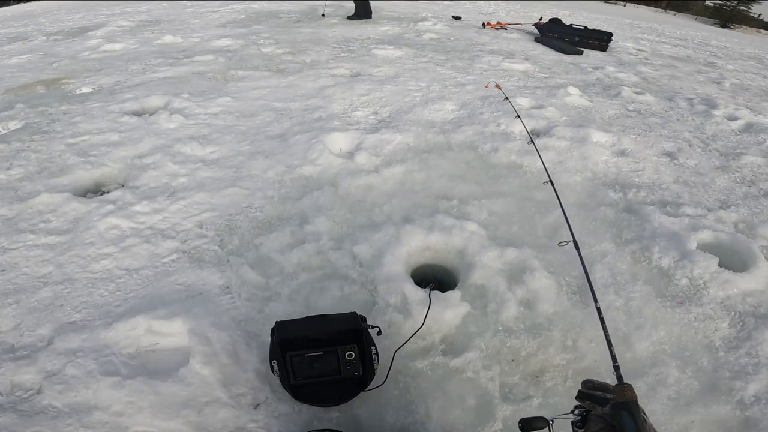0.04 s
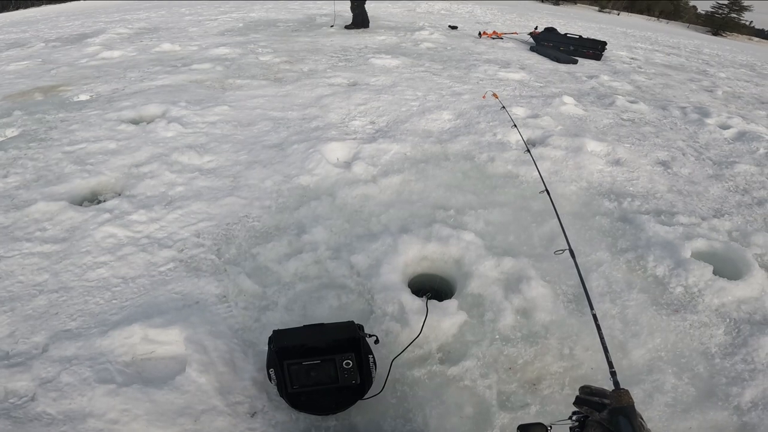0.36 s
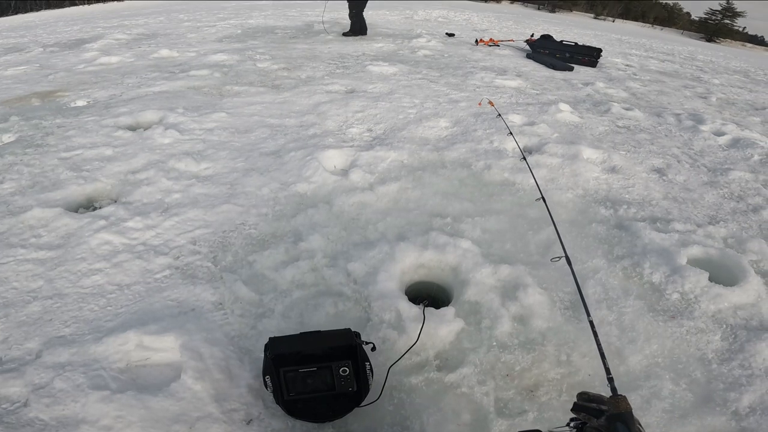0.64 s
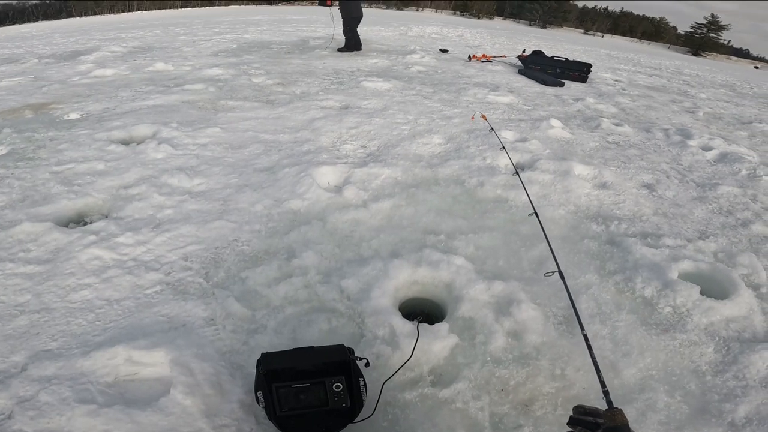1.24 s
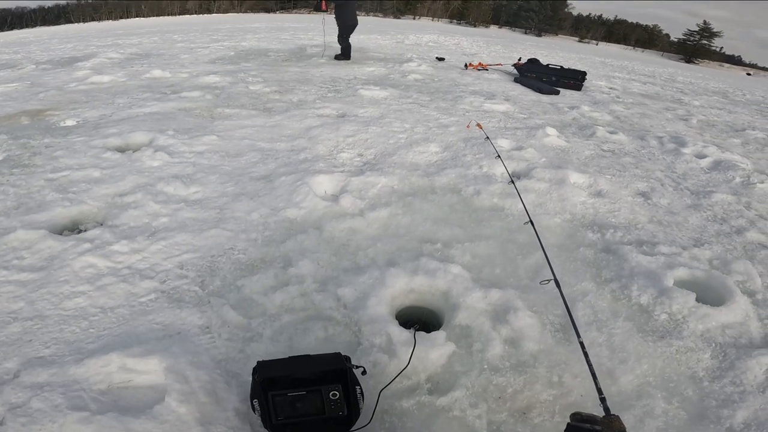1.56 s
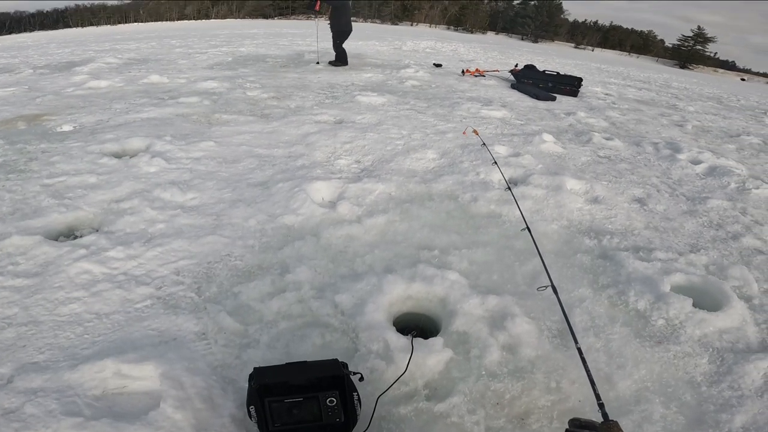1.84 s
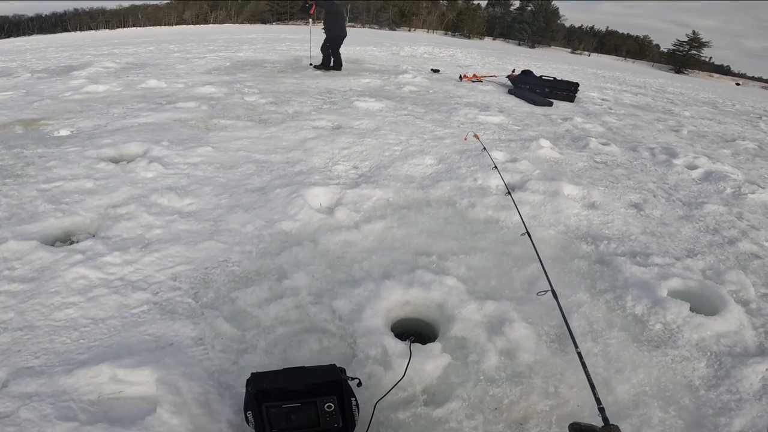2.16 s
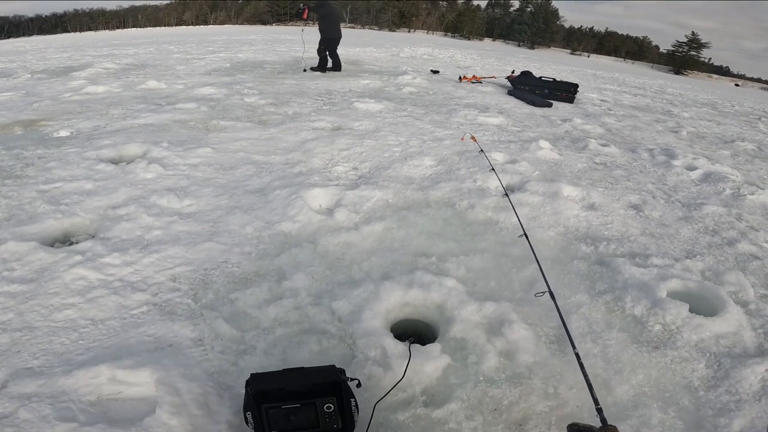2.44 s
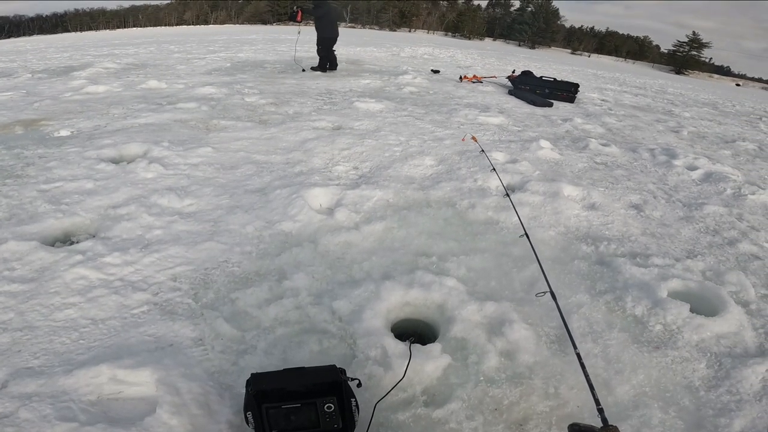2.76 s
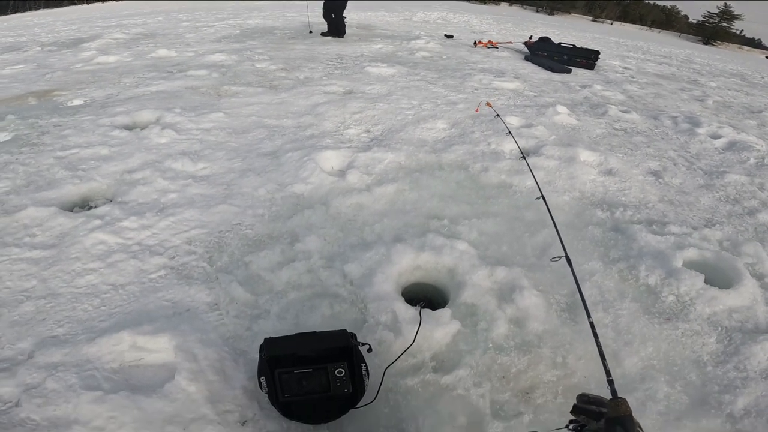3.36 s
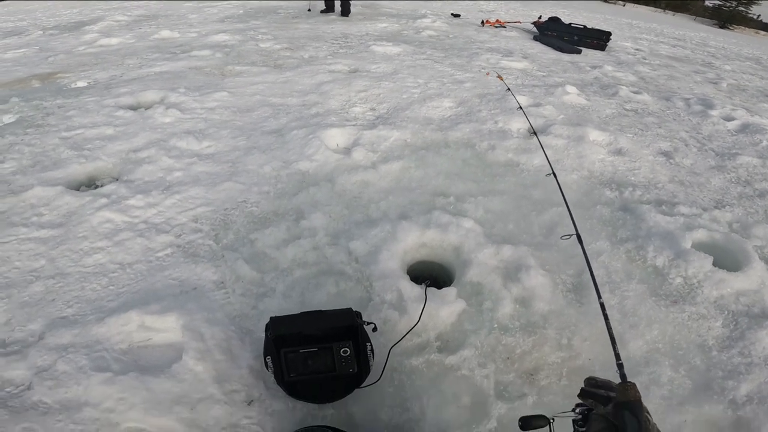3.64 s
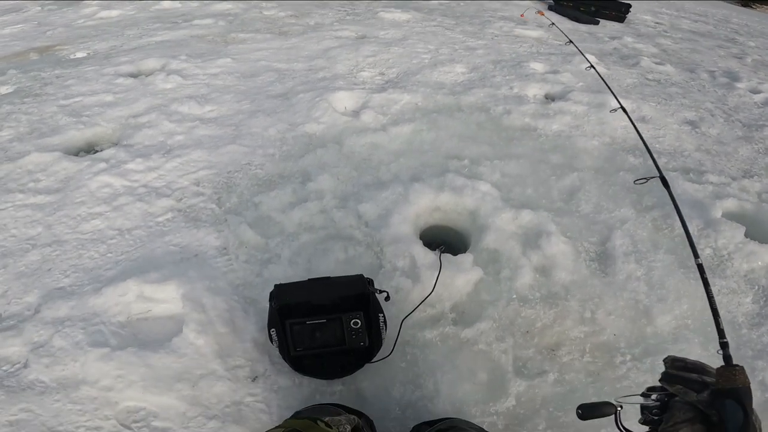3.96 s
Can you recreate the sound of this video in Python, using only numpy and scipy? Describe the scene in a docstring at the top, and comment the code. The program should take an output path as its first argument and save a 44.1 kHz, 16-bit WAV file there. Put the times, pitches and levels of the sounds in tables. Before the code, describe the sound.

Low, gusty wind buffets the microphone throughout, over a faint motor slowly growing far across the ice. An angler's gloves rub softly and tackle clicks nearby; two dull distant knocks come before the reel snaps shut once.

```python
"""Wind rumbles and thumps on the microphone; behind it a distant motor drones, slowly growing.
An angler on a frozen lake handles a short rod and reel: sleeves and gloves rub, the tackle ticks,
the slipping line squeaks, and the reel shuts once with a sharp, bouncing clack. Each contact is a
pulse that rings the reel's modes. Two dull knocks come from across the ice."""
import sys
import numpy as np
from scipy import signal
from scipy.fft import rfft, irfft
from scipy.io import wavfile
from scipy.ndimage import uniform_filter1d

SR = 44100
rng = np.random.default_rng(int(sys.argv[2]) if len(sys.argv) > 2 else 0)


def wrap_up_sound(samples):
    """Save the sound to the file named by the first command line argument, as 16-bit audio."""
    columns = np.atleast_2d(samples).T
    # keep every value between -1 and 1, then stretch to whole-number steps
    tamed = np.clip(columns, -1, 1)
    steps = np.round(tamed * 32767).astype(np.int16)
    wavfile.write(sys.argv[1], SR, steps)


N = 176400
T = np.arange(N) / SR


def from_db(db):
    """Decibels to gain."""
    return 10 ** (np.asarray(db) / 20)


def unit_rms(x):
    """Scale to unit power."""
    return x / np.sqrt(np.mean(x ** 2) + 1e-20)


def curves(rows):
    """One curve over T per column after the time column."""
    time_s, *columns = np.transpose(rows)
    return [np.interp(T, time_s, column) for column in columns]


def spectrum_db(points, hz):
    """Interpolate in octaves; 24 dB per octave roll-off past the ends."""
    point_hz, point_db = np.transpose(points)
    octave, known = np.log2(hz + 1), np.log2(point_hz)
    octaves_outside = np.abs(octave - np.clip(octave, known[0], known[-1]))
    return np.interp(octave, known, point_db) - 24 * octaves_outside


def coloured(x, spectrum):
    """Filter by a spectrum; unit power."""
    gain = from_db(spectrum_db(spectrum, np.fft.rfftfreq(N, 1 / SR)))
    return unit_rms(irfft(rfft(x) * gain, N))


def noise(spectrum):
    """Coloured noise, unit power."""
    return coloured(rng.standard_normal(N), spectrum)


def low_noise(edge_hz, shape, order=2):
    """Low-passed white noise."""
    return signal.sosfilt(signal.butter(order, edge_hz, fs=SR, output="sos"), rng.standard_normal(shape))


def evened(x, span_s):
    """Flatten slow level swings so an envelope can set the level."""
    size = max(int(span_s * SR), 2)
    power = uniform_filter1d(uniform_filter1d(x ** 2, size), size)
    return x / np.sqrt(power + 1e-9)


def air_hiss(level_db=-92.5):
    """Faint steady hiss."""
    # (frequency [Hz], density [dB])
    spectrum = [(1000, 15), (3000, 11.5), (6000, -16), (10000, 0), (15000, -5)]
    return from_db(level_db) * noise(spectrum)


def far_motor(tone_width_hz=5.7):
    """Distant drone: three broad noise bands and a faint, wavering tone that sinks."""
    # (time [s], low band [dB], middle band [dB], upper band [dB])
    band_levels = [(0.0, -59.5, -66.5, -74.5), (0.21, -60, -62.5, -73.5), (0.57, -55, -59, -76),
                   (1.12, -58, -60.5, -75), (1.47, -56.5, -62.5, -67.5), (1.73, -53.5, -59, -67),
                   (1.89, -53.5, -59, -62), (2.35, -52, -54, -65.5), (2.54, -51, -60, -65),
                   (2.78, -51.5, -64, -71.5), (3.02, -52, -56, -71), (3.24, -51, -54.5, -66),
                   (3.64, -48, -58.5, -65), (4.0, -47.5, -57, -61.5)]
    # (low trim [dB], middle trim [dB], upper trim [dB])
    trims_db = [0.07, 0.77, -0.5]
    # band spectra: (frequency [Hz], density [dB])
    low = [(250, -14), (380, -11.5), (430, -6.5), (530, -3), (605, -3), (680, 1.5), (760, -2), (845, -3),
           (930, -14), (1400, -44)]
    middle = [(600, -24), (900, -3), (1030, -0.5), (1270, -2.5), (1500, -11), (2000, -41)]
    upper = [(1100, -13), (1550, 3), (1900, -2), (2350, -12.5), (3100, -23.5), (6000, -42)]
    # (time [s], frequency [Hz], level [dB])
    tone_track = [(1.8, 465, -86), (2.55, 448, -61.5), (3.2, 437.6, -61.5), (4.0, 431.8, -67)]
    rush = sum(from_db(level_db + trim_db) * evened(noise(band), span_s=0.34)
               for level_db, trim_db, band in zip(curves(band_levels), trims_db, (low, middle, upper)))
    tone_hz, tone_db = curves(tone_track)
    waver = low_noise(tone_width_hz, (2, N))
    phase = 2 * np.pi * np.cumsum(tone_hz) / SR
    tone = unit_rms(waver[0] * np.cos(phase) + waver[1] * np.sin(phase))
    return rush + from_db(tone_db) * tone


def far_knocks(attack_s=0.0031, t60_s=0.084):
    """Hollow knocks across the ice, dulled by distance."""
    # (time [s], level [dB])
    knocks = [(2.587, -40), (3.131, -38)]
    # (frequency [Hz], density [dB])
    spectrum = [(350, -25), (500, 7), (600, -8), (700, 11), (850, -11), (1300, -26), (2200, -47)]
    envelope = np.zeros(N)
    for time_s, level_db in knocks:
        age_s = np.maximum(T - time_s, 0)
        envelope += from_db(level_db - 60 * age_s / t60_s) * np.minimum(age_s / attack_s, 1)
    return envelope * evened(noise(spectrum), span_s=0.0091)


def wind(rumble_trim_db=1, buffet_trim_db=-0.5):
    """Turbulence at the microphone: deep rumble with lumpy buffeting above it."""
    # (time [s], rumble level [dB], buffet level [dB])
    gusts = [(0.0, -33.5, -48.5), (0.03, -41.5, -52), (0.09, -32, -51), (0.12, -39, -47),
             (0.21, -29.5, -47), (0.31, -29.5, -42.5), (0.33, -27, -52.5), (0.44, -34, -52),
             (0.52, -39.5, -54.5), (0.57, -35.5, -48.5), (0.59, -37.5, -60), (0.76, -31.5, -49),
             (0.86, -36, -50.5), (0.95, -35.5, -46), (0.99, -45.5, -53.5), (1.04, -29, -55),
             (1.1, -29.5, -61.5), (1.12, -44.5, -54.5), (1.43, -40.5, -55), (1.56, -32, -53),
             (1.69, -44.5, -50), (1.9, -31, -49), (1.93, -41, -52), (2.03, -28, -54), (2.24, -37.5, -49.5),
             (2.34, -31.5, -58), (2.57, -50, -53), (2.74, -42, -54.5), (2.77, -36, -55.5),
             (2.95, -48.5, -51.5), (3.06, -34.5, -54), (3.29, -35.5, -52), (3.32, -50, -55.5),
             (3.5, -43, -55.5), (3.54, -31.5, -48.5), (3.65, -53, -51.5), (3.69, -40.5, -54),
             (3.79, -40, -46.5), (3.88, -23, -48), (4.0, -51.5, -48.5)]
    # (frequency [Hz], density [dB])
    rumble_spectrum = [(12, -1.5), (25, 4), (45, -1.5), (80, -12.5), (120, -21.5), (250, -44)]
    buffet_spectrum = [(50, -14), (100, -3.5), (190, -1), (260, -9), (350, -22.5), (600, -37),
                       (1500, -66.5)]
    rumble_db, buffet_db = curves(gusts)
    rumble = from_db(rumble_db + rumble_trim_db) * evened(noise(rumble_spectrum), span_s=0.045)
    buffet = from_db(buffet_db + buffet_trim_db) * evened(noise(buffet_spectrum), span_s=0.045)
    return rumble + buffet


def low_thumps(sigma_s=0.011, low_edge_hz=83, trim_db=-0.5, size=8192):
    """Brief low thumps: wind puffs on the microphone and the dull thud of the reel's clack."""
    # (time [s], level [dB], upper edge [Hz])
    thumps = [(.11, -38, 170), (0.143, -36, 159), (0.183, -39.5, 178), (.275, -33.5, 213.6),
              (0.373, -28, 209), (0.406, -40.5, 340), (0.444, -39, 170), (0.658, -38, 150.4),
              (0.702, -37.5, 200), (.80, -35, 217), (.925, -41, 168), (1.05, -31.5, 141),
              (1.109, -42.5, 171), (1.537, -32.5, 167), (1.579, -39.5, 174), (1.897, -46, 130),
              (1.955, -42, 196), (1.992, -41, 160), (2.04, -33, 190), (2.108, -37.5, 138),
              (2.172, -40.5, 195), (2.349, -34.5, 164), (2.392, -30.5, 204), (2.839, -45, 175),
              (3.109, -46, 159.3), (3.18, -42, 198), (3.548, -41, 159), (3.577, -41.5, 330),
              (3.856, -28.5, 166.6), (3.897, -28.5, 150)]
    out = np.zeros(N + 2 * size)
    t = (np.arange(size) - size // 2) / SR
    window = np.exp(-0.5 * (t / sigma_s) ** 2)
    highpass = signal.butter(2, low_edge_hz, "high", fs=SR, output="sos")
    for time_s, level_db, edge_hz in thumps:
        thump = window * signal.sosfilt(highpass, low_noise(edge_hz, size, order=4))
        thump *= np.sqrt(np.sum(window ** 2) / np.sum(thump ** 2))
        start = int(time_s * SR) + size // 2
        out[start:start + size] += from_db(level_db + trim_db) * thump
    return out[size:size + N]


def rustle(snaps_per_s=800, spread_db=3, flicker_db=3, flicker_hz=45, trim_db=2.5):
    """Stiff sleeves and gloves rub and catch: tiny uneven snaps over a smooth hiss."""
    # (time [s], level [dB])
    rubbing = [(0, -81.5), (.13, -107), (.21, -90), (.25, -99), (.275, -86.5), (.34, -102), (.45, -84),
               (.55, -101), (.66, -86.5), (.8, -102), (1.23, -99), (1.27, -77.5), (1.34, -96), (1.5, -77),
               (1.63, -89.5), (1.75, -72), (1.86, -86.5), (1.96, -75), (2.1, -84), (2.17, -98), (2.3, -102),
               (2.37, -75), (2.5, -80.5), (2.6, -90), (2.72, -84), (2.98, -95), (3.06, -77.5),
               (3.25, -79.5), (3.39, -90.5), (3.58, -67), (3.7, -88), (3.79, -81), (3.855, -71), (3.9, -77),
               (4, -81.5)]
    # (frequency [Hz], density [dB])
    cloth_spectrum = [(1200, -5.5), (2500, 8), (4000, 0.5), (5300, 2), (7200, -1), (8600, -9), (10500, -15),
                      (12200, -13), (13500, -21.5)]
    sizes = from_db(spread_db * np.minimum(rng.exponential(1, N), 5)) * rng.choice([-1, 1], N)
    snaps = unit_rms(sizes * (rng.random(N) < snaps_per_s / SR))
    level_db, = curves(rubbing)
    catching = unit_rms(low_noise(flicker_hz, N))
    envelope = from_db(level_db + trim_db + flicker_db * catching)
    return envelope * coloured(snaps + rng.standard_normal(N), cloth_spectrum)


def line_squeak(time_s=2.3468, width_s=0.005, level_db=-62):
    """The line slips with a very short, thin squeak."""
    # (frequency [Hz], density [dB])
    spectrum = [(10500, -12), (11300, -14), (11600, 3), (12000, -20), (12400, -16), (12900, -31)]
    return from_db(level_db) * np.exp(-np.abs(T - time_s) / width_s) * noise(spectrum)


def contact(slope_db_per_oct, part_hz, size=4096):
    """A sharp pulse, coloured by the touched part, rings the reel and scatters off body and ice."""
    # (frequency [Hz], level [dB])
    pulse_spectrum = [(200, -19.5), (450, -13), (800, -9), (1250, -9), (1650, -6.5), (2050, -8), (2600, -4),
                      (4000, -9.5), (6500, -7.5), (9000, -10.5), (12000, -16.5), (14500, -23.5)]
    # (frequency [Hz], level [dB], t60 [s])
    reel_modes = [(1300, -34, 0.016), (1712, -29, .018), (2480, -37, 0.019), (3000, -40.5, 0.031),
                  (3380, -38.5, 0.024), (3650, -35.5, 0.03), (4120, -36, 0.035), (4480, -31, 0.011),
                  (4980, -37, 0.033), (5280, -35.5, 0.045), (5770, -45, 0.051)]
    slope_from_hz, pivot_hz = 1500, 3745
    part_db, part_sigma_oct = 6.5, 0.25
    scatter_db, scatter_t60_s = -22, 0.028
    hz, t = np.fft.rfftfreq(size, 1 / SR), np.arange(size) / SR
    tilt_db = slope_db_per_oct * np.log2(np.maximum(hz, slope_from_hz) / pivot_hz)
    resonance_db = part_db * np.exp(-0.5 * (np.log2((hz + 1) / part_hz) / part_sigma_oct) ** 2)
    log_gain = np.log(from_db(spectrum_db(pulse_spectrum, hz) + tilt_db + resonance_db) + 1e-4)
    mirrored = np.r_[log_gain, log_gain[-2:0:-1]]
    pulse = np.exp(np.conj(signal.hilbert(mirrored)))[:len(hz)]  # minimum phase: causal
    scatter = from_db(scatter_db - 60 * t / scatter_t60_s) * rng.standard_normal(size)
    ring = sum(from_db(level_db - 60 * t / t60_s) * np.cos(2 * np.pi * mode_hz * t)
               for mode_hz, level_db, t60_s in reel_modes)
    return irfft(pulse * (1 + rfft(scatter + ring)), size)


def tackle(scrape_db=-28, scrape_rise_s=0.002, lead_samples=400):
    """Rod and reel tick, the reel clacks shut and bounces; surfaces scrape just before they catch."""
    # (time [s], gain [dB], slope [dB/octave], resonance of touched part [Hz])
    clack = [(3.5726, -8, -10.5, 3100), (3.5751, -12, -6.5, 1660), (3.5757, -12.5, -10, 2570)]
    ticks = [(.443, -40, 2.5, 4750), (.656, -38, -2.5, 5170), (1.268, -30.5, -10, 6800),
             (1.299, -46, -14, 5000), (1.348, -46, -4, 2950), (1.446, -46, -8, 5050),
             (1.460, -38, -8, 5200), (1.4905, -18.5, -10.5, 2450), (1.511, -38, -9, 5300),
             (1.544, -44, -4, 5300), (1.7128, -18, -8, 1150), (1.728, -31, -1, 6030),
             (1.756, -37, -9, 2500), (1.799, -33.5, -12, 6000), (1.909, -33, -8, 5570),
             (1.957, -26, -11.5, 5930), (2.0771, -27, -8, 6200), (2.346, -27.5, -3, 1300),
             (2.365, -30, -1.5, 3800), (2.405, -35, -17, 1290), (2.4127, -23, -4, 1800),
             (2.474, -37, 2, 4170), (2.533, -33, -5, 1900), (2.693, -38, -1, 11860),
             (3.0265, -29, -5, 2620), (3.074, -38, -7, 4050), (3.429, -37.5, -5.5, 4000),
             (3.4615, -36.5, -7, 4000), (3.482, -38, -7, 4500), (3.507, -40, -12, 2800),
             (3.539, -40, -7, 4000), (3.5495, -37, -4, 3000), (3.589, -34, -5, 5000),
             (3.623, -33.5, -8, 4500), (3.742, -48, 2.5, 5500), (3.852, -25.5, -8.5, 5000),
             (3.856, -29.5, -9, 3130), (3.916, -40, -6, 3100)]
    out = np.zeros(N + SR)
    scrape_envelope = from_db(scrape_db) * np.exp(np.arange(-lead_samples, 0) / SR / scrape_rise_s)
    for time_s, gain_db, slope_db_per_oct, part_hz in clack + ticks:
        scrape = scrape_envelope * rng.standard_normal(lead_samples)
        hit = from_db(gain_db) * np.convolve(np.r_[scrape, 1], contact(slope_db_per_oct, part_hz))
        start = int(time_s * SR) - lead_samples
        out[start:start + len(hit)] += hit
    return out[:N]


def scene():
    """Mono mix at the angler's head."""
    mix = wind() + low_thumps() + far_motor() + rustle() + tackle() + line_squeak() + far_knocks()
    return (mix + air_hiss())[None]


def record(dry):
    """Steep low-pass on the top treble."""
    stop_db, stop_hz = 60, 15500
    return signal.sosfilt(signal.cheby2(12, stop_db, stop_hz, fs=SR, output="sos"), dry)


dry = scene()
out = record(dry)
wrap_up_sound(out)
```